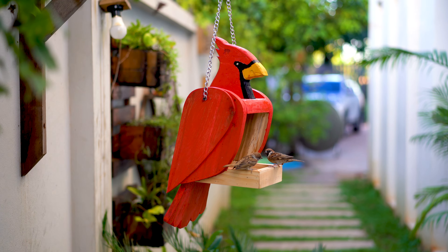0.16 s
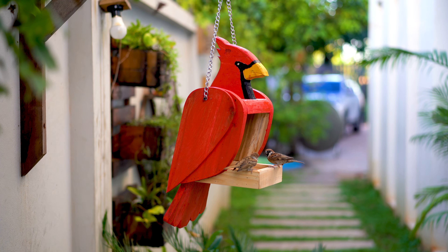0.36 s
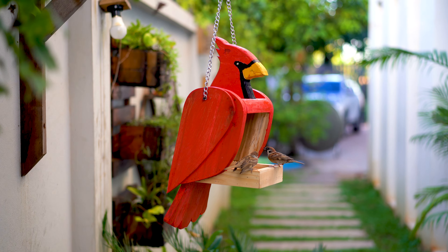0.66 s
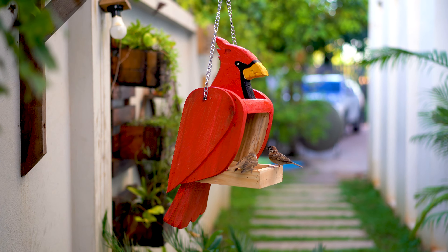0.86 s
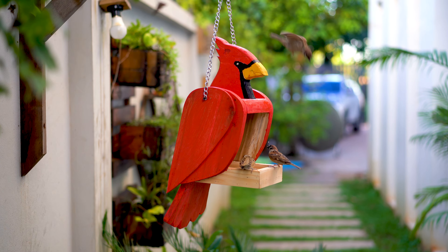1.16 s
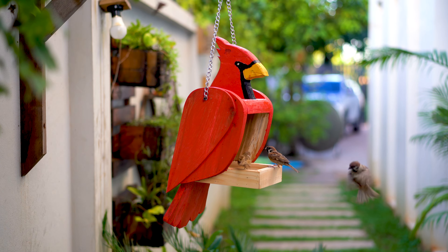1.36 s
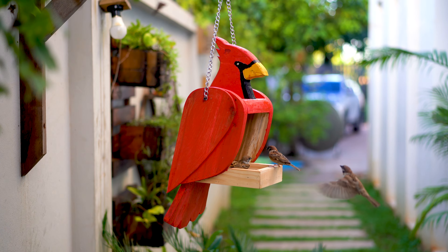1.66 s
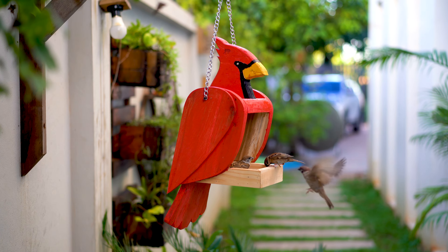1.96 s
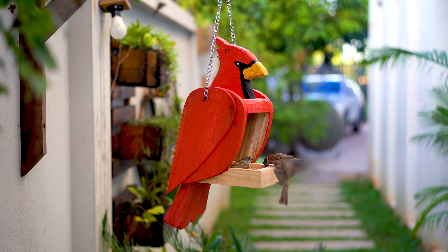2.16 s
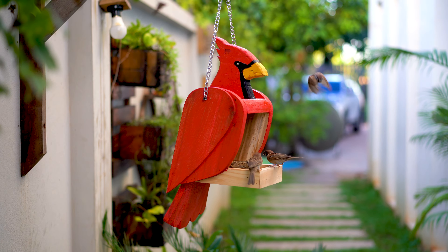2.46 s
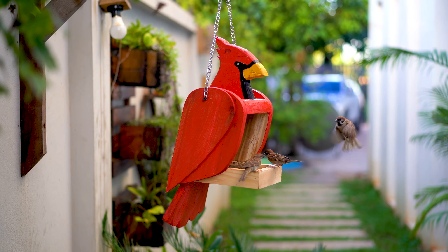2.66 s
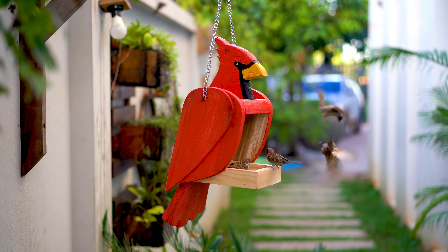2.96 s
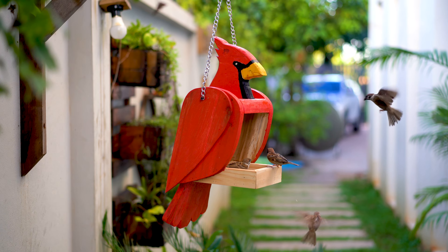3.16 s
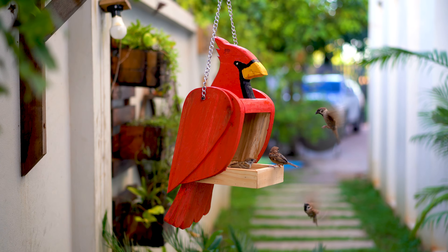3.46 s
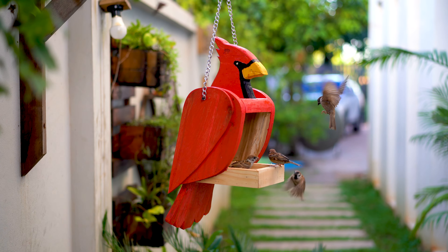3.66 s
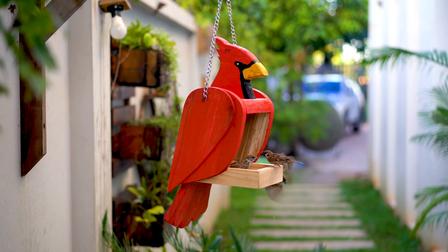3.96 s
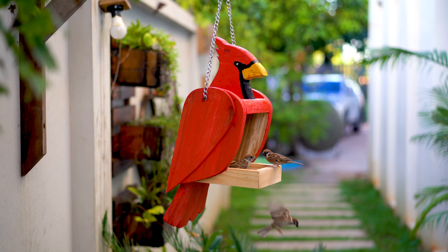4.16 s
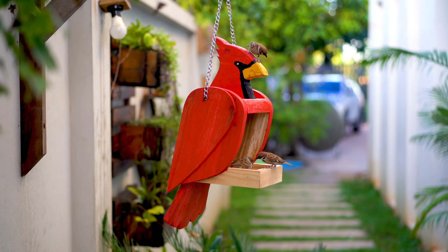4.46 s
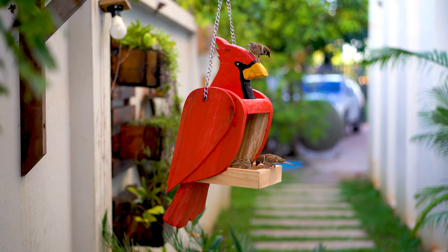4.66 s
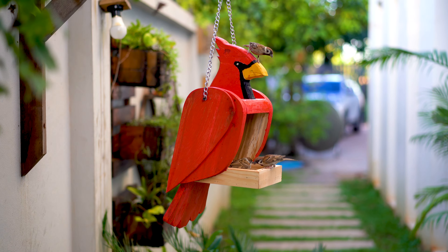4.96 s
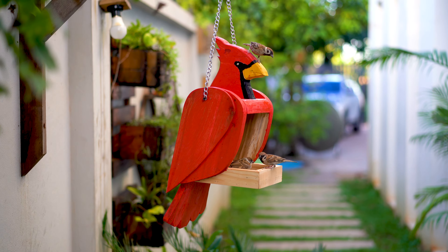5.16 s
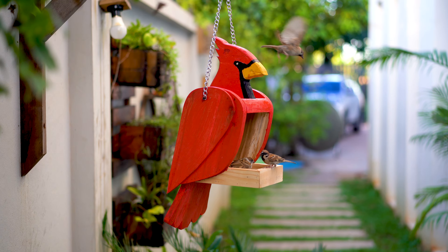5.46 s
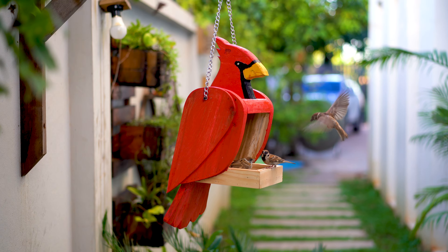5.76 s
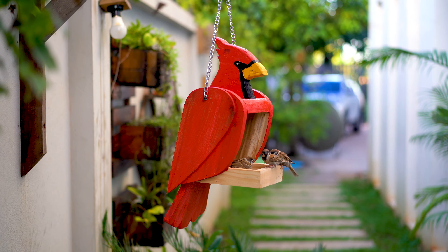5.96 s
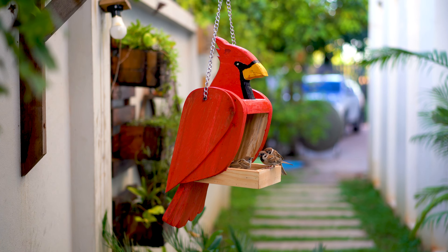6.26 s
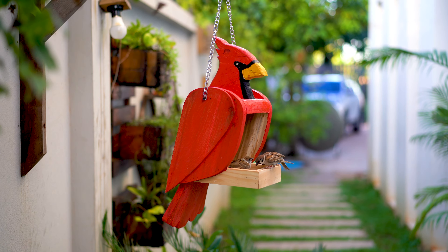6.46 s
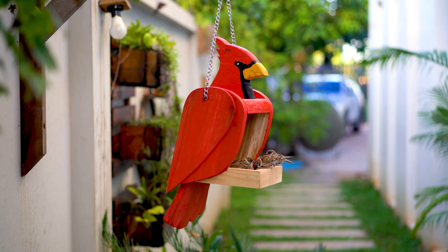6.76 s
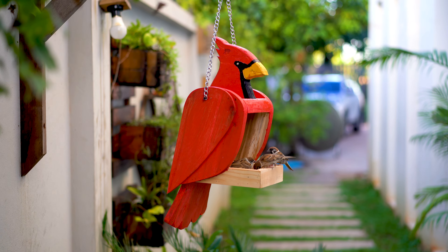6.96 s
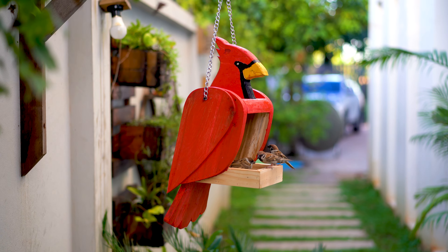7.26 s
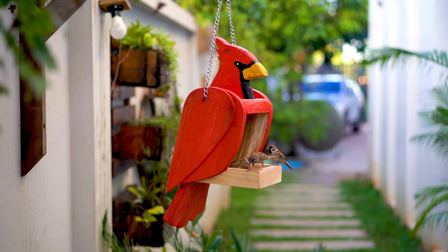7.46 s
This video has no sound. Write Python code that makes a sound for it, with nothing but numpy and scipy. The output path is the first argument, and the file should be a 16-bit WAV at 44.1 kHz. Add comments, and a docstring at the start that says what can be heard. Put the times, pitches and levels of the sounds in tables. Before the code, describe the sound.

A quiet walled garden with a soft leafy wash, very faint hum and high, steady insect shimmer, picked up in stereo near a feeder. A nearby sparrow gives sharp, hoarse-edged, falling chirps at about 0.1, 0.8, 1.9, 2.8 and 4.3 seconds, each under a tenth of a second, with short wall echoes. Faint sparrows answer between them. Thin insect buzzes come in bouts until 3.1; a pulsing cricket fades by 3.7 and a slightly lower one starts at 4.5. Light husk and feather rustling begins around 1.2, with a claw tick at 3.0 and a brief flutter with two ticks near 3.9. Distant roosters crow faintly from 1.2 to 3.4. A second sparrow chirps at 4.6, 5.4, 6.1 and 6.9. Five mellow, rising hoots sound from 4.5 to 6.0, then rough, echoing rooster crows from 6.15 to the end.

```python
"""Two sparrows chirp in turn at a feeder in a narrow walled garden: two whistled voices glide down in
each chirp, and sparse reflections from the walls smear it. Farther off a sparrow answers, a larger bird
hoots five times and roosters crow, their harmonics shaped by throat resonances. Shaped noise makes
the rustling wings, claw ticks and rush of air at the feeder, the shrill insects in the bushes
and the low outdoor wash; sines add faint hums."""
import sys
import numpy as np
from scipy import signal
from scipy.fft import rfft, irfft
from scipy.io import wavfile

SR = 44100
rng = np.random.default_rng(int(sys.argv[2]) if len(sys.argv) > 2 else 0)


def store_wav(level_fs):
    """Save 16-bit WAV to argv[1]."""
    pcm = np.round(np.clip(np.atleast_2d(level_fs), -1, 1) * 32767)
    wavfile.write(sys.argv[1], SR, pcm.T.astype(np.int16))


N = 335160
TIME = np.arange(N) / SR  # s
BINS = np.fft.rfftfreq(N, 1 / SR)  # Hz

# Sparrow chirps, one table a bird: start_s, level_db, pitch_hz, length_s
LEFT_CHIRPS = [(.059, -17.7, 4700, .080), (.820, -17.3, 4680, .079), (1.897, -17.6, 4630, .076),
               (2.814, -17.6, 4560, .074), (4.297, -16.4, 4560, .074)]
RIGHT_CHIRPS = [(4.601, -19.7, 4460, .067), (5.390, -18.5, 4470, .067), (6.126, -18.3, 4500, .067),
                (6.926, -18.2, 4530, .068)]
FAR_CHIRPS = [(.31, -46, 4250, .10), (.69, -52, 4800, .07), (1.16, -46, 4940, 0.13),
              (1.48, -44, 4520, 0.12), (2.07, -47.5, 4200, .11), (2.66, -44.5, 4260, .12),
              (3.21, -44, 4390, 0.09), (3.80, -47.5, 4230, .12), (6.36, -41, 4570, .11)]
# Air hissing through the beak with each chirp: frequency_hz, relative_density_db
BEAK_HISS = [(2000, -25), (4000, 11), (7500, 0), (9000, -3), (11500, -12), (13200, -3), (14500, -3),
             (16000, -21)]
# A chirp opens high and hoarse, breaks into a loud whistle, crests, and falls as it fades
BREAK_AT, CREST_AT, FADE_AT = .32, .47, .64  # shares of the chirp's length
OPENING_LIFT, FALL = .09, .41  # pitch above the crest in the opening, below it at the end (shares)
VOICE_SPREAD = .3  # how much higher the second voice starts (share of the pitch)
BREAK_STEP_DB, RELEASE_DB = 3, -20  # the opening is this much weaker; level change of the final fade
BREAK_PUFF_DB = 10.5  # extra hiss as the voice breaks

# Hoots: start_s, length_s, pitch_hz, level_db, scoop_s (time up to the pitch), swell_db (over the note)
HOOTS = [(4.494, 0.16, 1077, -38.5, 0.0049, -12), (4.742, .14, 1067, -31, 0.026, 9),
         (5.05, 0.17, 1069, -33, 0.021, 8), (5.386, .19, 1116, -26, .11, 4.5),
         (5.791, .16, 1109, -26, .09, -2)]
HOOT_SCOOP, HOOT_DROP_S, HOOT_SLACK_DB = .115, .046, -13  # full pitch sag (share), closing time, its level
# Crow syllables: start_s, length_s, pitch_hz, level_db, roughness (0-1), overtones_db
FAR_CROWS = [(1.97, 0.33, 720, -42.5, 0.26, 1), (2.23, 0.163, 848, -37.5, 0.53, 0),
             (2.40, 0.2, 835, -51, 0.56, 0), (2.69, 0.14, 635, -47, 0.3, -1),
             (2.86, 0.294, 743, -47.5, .27, -4), (3.22, .15, 720, -49, .35, -11)]
FAINT_CROWS = [(1.2, 0.385, 425, -54.5, 0.89, 0), (1.629, 0.194, 408.6, -44.5, 0.53, 5)]
NEAR_CROWS = [(6.15, 0.14, 907.6, -38, 0.47, 1), (6.23, .12, 1009, -34.5, 0.54, -2.5),
              (6.27, 0.178, 884.5, -38, 0.43, 4), (6.5, 0.166, 1048, -34.5, 0.083, 2),
              (6.63, .47, 1015, -38, 0.365, 7)]
# The near rooster's second voice in its long note, same columns
UNDERTONE = [(6.49, .68, 911.5, -46, 0.516, -1.3)]
LAST_CROWS = [(6.64, 0.62, 746, -45, 0.615, 0), (7.13, 0.22, 735, -37.5, 0.41, 1.9),
              (7.42, .22, 750, -46.5, 0.34, 0.067)]
CROW_ARCH, CROW_ATTACK_S, CROW_RELEASE_S = .035, .026, .057  # end pitch sag (share), rise and fall times
# Throat resonances: frequency_hz, gain_db
HOOT_THROAT = [(1100, 0), (2200, -26), (3300, -23), (4400, -40)]
FAR_THROAT = [(600, 0), (730, 0), (1400, -9), (1700, -8), (2200, -10), (2500, -17), (4200, -35)]
FAINT_THROAT = [(420, -28), (820, 1), (1230, 3), (1620, 9), (2050, -17), (2500, -28)]
NEAR_THROAT = [(900, -1), (1050, -2), (1800, -12), (1970, -9), (2080, 1), (2650, -7), (3100, -12),
               (4200, -24)]
LAST_THROAT = [(730, -33), (1450, -6), (2200, 5), (2900, 3), (3600, -44), (4400, -3)]

# Flights round the feeder: start_s, end_s, rustle_db (feathers), rush_db (low rush of air)
FLIGHTS = [(1.21, 1.71, -54, -57.5), (1.6, 2.706, -52.5, -75), (2.448, 3.85, -49, -56),
           (3.78, 4.517, -48.5, -56.5)]
FLIGHT_TAPER = .45  # share of a flight spent swelling and fading
# Wing strokes: centre_s, peak_level_db, length_s
WINGS = [(3.939, -43, 0.088), (3.978, -48, .04), (4.03, -40, 0.069)]
# Claw ticks: start_s, initial_level_db
TICKS = [(3, -21.5), (3.9279, -16), (3.9712, -21)]
PECKING_FROM_S, PECKING_DB = 1.14, -52.5  # steady rustle of husks
# Spectrum of husks and feathers: frequency_hz, relative_density_db
RUSTLE_COLOUR = [(100, -34), (400, -11.5), (1100, -2.5), (2500, -6.5), (6000, -7), (15000, -12)]

# Steady insect choruses: centre_hz, nominal_width_hz, level_db
CHORUS = [(5180, 480, -50), (6554, 305, -47), (10305, 590, -50)]
# Throbbing crickets, one falling silent and one starting: time_s, level_db
HIGH_CRICKET = [(0, -45.5), (1.4, -43), (1.5, -48.5), (3.5, -57), (3.7, -80)]
LOW_CRICKET = [(4.47, -82), (4.52, -44), (7.6, -45.5)]
CRICKET_PAN = -4  # left minus right, dB
# Katydid buzzes: start_s, end_s
BUZZES = [(0, .29), (.494, 1), (1.193, 1.68), (2.057, 2.45), (2.74, 3.14)]
BUZZ_DB = -47.8

# Spectrum of the outdoor wash: frequency_hz, relative_density_db
WASH = [(25, -36), (50, -12), (90, -10.5), (160, -10.5), (300, -4), (400, -6), (520, 5.5), (800, -3.5),
        (1500, -5), (2400, -7), (3300, 2), (4400, 3.5), (7600, -8.5), (10500, -0.5), (12000, -23),
        (16000, -16)]
# Left-right likeness of all diffuse noise: frequency_hz, likeness (0-1)
SAME = [(130, 1), (290, 0.95), (640, 0.66), (1400, 0.16), (3000, 0)]
WASH_DB, RUMBLE_DB = -46.5, -65  # leaves and street; the street's rumble
# Spectrum of the low rumble and the rush of air: frequency_hz, relative_density_db
RUMBLE_COLOUR = [(40, -43), (110, 7.5), (200, 1.5), (330, 5.5), (900, 4), (2500, -50)]
# Hums before their common swell: frequency_hz, level_db
HUMS = [(100, -71), (684, -62)]
# Common swell of the hums: time_s, gain_db
HUM_SWELL = [(0, -14), (1.6, -9), (2.6, -1), (7.6, 0)]


def sparrow(chirps, swell_db, dip, second_ratio, second_db, hoarse_db, jitter, rasp, hiss_db, third_db):
    """Two-voice syrinx: both sides whistle a falling glide; the opening is hoarse, its voices far apart."""
    out, air = np.zeros(N), np.zeros(N)
    for start, db, pitch, length in chirps:
        u = np.arange(0, 1, 1 / (length * SR))  # share of the chirp elapsed
        opening = 1 / (1 + (u / BREAK_AT) ** 20)
        to_full = np.maximum(1 - u / CREST_AT, 0)
        to_crest = np.clip((CREST_AT - u) / (CREST_AT - BREAK_AT), 0, 1)
        falling = np.maximum(u - CREST_AT, 0) / (1 - CREST_AT)
        fading = np.maximum(u - FADE_AT, 0) / (1 - FADE_AT)

        rise = OPENING_LIFT * opening - dip * (1 - opening) * np.sqrt(to_crest)
        hz = pitch * (1 + rise - FALL * falling ** 1.2)
        effort_db = -swell_db * to_full - BREAK_STEP_DB * opening + RELEASE_DB * fading ** 1.5

        first_shake = 1 + jitter * (1 + 1.475 * opening) * wander(len(u), 676)
        first = phase_of(hz * first_shake)
        second_hz = hz * (second_ratio + VOICE_SPREAD * to_full)
        second = phase_of(second_hz * (1 + 2 * jitter * wander(len(u), 534)))
        voice = np.sin(first) + amp(second_db + hoarse_db * opening) * np.sin(second)
        voice += amp(third_db) * np.sin(3 * first)  # third harmonic
        rough_voice = voice * (1 + rasp * wander(len(u), 570))

        edges = amp(db) * signal.windows.tukey(len(u), .05)
        puff = np.exp(-((u - BREAK_AT) / 0.17) ** 2)
        add(out, start, edges * unit(amp(effort_db) * rough_voice))
        add(air, start, edges * amp(hiss_db + .5 * effort_db + BREAK_PUFF_DB * puff))
    return out + air * noise(amp(read(BEAK_HISS, BINS)))[0]


def sparrows():
    """Direct-to-reverberant ratio: near birds with early wall echoes, a far one with stronger echoes."""
    near = dict(jitter=.025, rasp=.18, hiss_db=-13.5)
    left = sparrow(LEFT_CHIRPS, swell_db=20, dip=0.119, second_ratio=1.21, second_db=-9.5,
                   hoarse_db=6.5, third_db=-28, **near)
    right = sparrow(RIGHT_CHIRPS, swell_db=18.5, dip=0.0466, second_ratio=1.25, second_db=-10.5,
                    hoarse_db=2.5, third_db=-35, **near)
    far = sparrow(FAR_CHIRPS, swell_db=3, dip=0, second_ratio=1.0, second_db=-14,
                  hoarse_db=-1, jitter=0.0404, rasp=.18, hiss_db=-26, third_db=-45)
    out = garden(left, lag=-7, pan_db=1.5, wall_db=0, wall_t60=.19, far_db=-11.0, far_t60=0.61)
    out += garden(right, lag=7, pan_db=-1.5, wall_db=0, wall_t60=.19, far_db=-3, far_t60=0.47)
    return out + garden(far, lag=0, pan_db=0, wall_db=6, wall_t60=.25, far_db=3, far_t60=.6)


def caller(note, rows, throat, jitter, waver):
    """Source and filter: harmonics of a wavering pitch pass the throat; roughness shakes the pitch faster."""
    out = np.zeros(N)
    for row in rows:
        start, hz, gain, rough, overtones_db = note(*row)
        hz = hz * (1 + waver * wander(len(hz), 35.2) + jitter * rough * wander(len(hz), 226))
        phase = phase_of(hz)
        voice = np.zeros(len(hz))
        for k in range(1, 7):
            harmonic_db = read(throat, k * hz) + overtones_db * (k > 1)
            voice += amp(harmonic_db) * np.sin(k * phase)
        add(out, start, gain * unit(voice))
    return out


def hoot(start, length, pitch, db, scoop_s, swell_db):
    """Coupled pitch and level: a clear note scoops up, holds and drops, weak wherever the pitch sags."""
    t = np.arange(0, length, 1 / SR)
    opening_sag = np.maximum(1 - t / scoop_s, 0) ** 1.32
    closing_sag = np.maximum(1 - (length - t) / HOOT_DROP_S, 0) ** 2
    sag = opening_sag + closing_sag
    level_db = db + swell_db * (t / length - .5) + HOOT_SLACK_DB * sag
    gain = amp(level_db) * signal.windows.tukey(len(t), .08)
    return start, pitch * (1 - HOOT_SCOOP * sag), gain, 1, 0


def crow(start, length, pitch, db, rough, overtones_db):
    """Pitch contour and envelope of a syllable: a shallow arch under attack, hold and release."""
    t = np.arange(0, length, 1 / SR)
    attack = np.minimum(t / CROW_ATTACK_S, 1)
    release = np.minimum((length - t) / CROW_RELEASE_S, 1)
    hz = pitch * (1 - CROW_ARCH * (2 * t / length - 1) ** 2)
    return start, hz, amp(db) * attack * release, rough, overtones_db


def neighbours():
    """Reverberation between houses: the hooting bird and the roosters ring on in long tails."""
    hoots = caller(hoot, HOOTS, HOOT_THROAT, jitter=0.011, waver=0.0106)
    far = caller(crow, FAR_CROWS, FAR_THROAT, jitter=0.072, waver=0.0096)
    far += caller(crow, FAINT_CROWS, FAINT_THROAT, jitter=0.095, waver=0.0134)
    near = caller(crow, NEAR_CROWS + UNDERTONE, NEAR_THROAT, jitter=0.0725, waver=0.0078)
    near += caller(crow, LAST_CROWS, LAST_THROAT, jitter=0.0744, waver=0.0124)
    out = garden(hoots, lag=5, pan_db=-2.5, wall_db=-11, wall_t60=.4, far_db=-8, far_t60=.9)
    out += garden(far, lag=0, pan_db=0.5, wall_db=1.5, wall_t60=0.28, far_db=1.5, far_t60=0.85)
    return out + garden(near, lag=2, pan_db=-2, wall_db=1.5, wall_t60=0.32, far_db=2.5, far_t60=1.0)


def feeder():
    """Friction and impact noise: grainy husks and feathers, a low rush of air, dry ticks of claws."""
    rustle = amp(PECKING_DB) * np.clip((TIME - PECKING_FROM_S) / 0.11, 0, 1)
    rush, ticks = np.zeros(N), np.zeros(N)
    for start, end, rustle_db, rush_db in FLIGHTS:
        flight = bout(start, end, FLIGHT_TAPER)
        rustle += amp(rustle_db) * flight
        rush += amp(rush_db) * flight
    for centre, db, length in WINGS:
        add(rustle, centre - length / 2, amp(db) * np.hanning(int(length * SR)))
    t = TIME[:400]
    for start, db in TICKS:
        add(ticks, start, amp(db) * rng.standard_normal(len(t)) * np.exp(-t / 0.00047))
    grain = unit(amp(2.0 * wander(N, 240) + 2.2 * wander(N, 25)))
    feathers = rustle * grain * noise(amp(read(RUSTLE_COLOUR, BINS)))
    return feathers + rush * noise(amp(read(RUMBLE_COLOUR, BINS))) + ticks


def shrill(hz, width):
    """Resonance driven by noise: many wing strokes ring one peak, heard from afar."""
    return noise(1 / (1 + ((BINS - hz) / (1.04 * width)) ** 2) ** 1.37)


def cricket(curve, hz, second_hz, second_db, width, throb_rate, peak_s, stroke_rate, stroke_depth, pan_db):
    """Amplitude modulation: quick wing strokes in throbs that rock between two neighbouring rings."""
    throb_phase = 2 * np.pi * throb_rate * (TIME - peak_s) + 0.31 * wander(N, 7)
    first = .5 + .5 * np.cos(throb_phase)  # share of the first ring
    ring = first * shrill(hz, width)
    ring += amp(second_db) * (1 - first) * shrill(second_hz, 1.75 * width)
    strokes = 1 + stroke_depth * np.cos(2 * np.pi * stroke_rate * TIME + wander(N, 7.1))
    return level(curve) * unit(ring * strokes) * pan_gains(pan_db)


def insects():
    """Superposed stridulation: steady choruses, two crickets and a katydid that buzzes in bouts."""
    chorus = sum(amp(db) * shrill(hz, width) for hz, width, db in CHORUS)
    out = chorus * amp(.5 * wander(N, 8.0))
    out += cricket(HIGH_CRICKET, hz=9020, second_hz=8980, second_db=-6.5, width=330, throb_rate=7.6,
                   peak_s=0.202, stroke_rate=180, stroke_depth=0.12, pan_db=CRICKET_PAN)
    out += cricket(LOW_CRICKET, hz=8405, second_hz=8670, second_db=-3, width=430, throb_rate=8.1,
                   peak_s=4.585, stroke_rate=121, stroke_depth=0.2, pan_db=CRICKET_PAN)
    buzzing = sum(bout(start, end, taper=0.38) for start, end in BUZZES)
    return out + amp(BUZZ_DB) * buzzing * shrill(hz=11200, width=460)


def outdoors():
    """Diffuse field: a noise wash of leaves and street, a low rumble, and faint sine hums."""
    wash = amp(WASH_DB + 0.096 * wander(N, 12.9)) * noise(amp(read(WASH, BINS)))
    rumble = amp(RUMBLE_DB) * noise(amp(read(RUMBLE_COLOUR, BINS)))
    hum = np.zeros(N)
    for hz, db in HUMS:
        gain = np.sqrt(2) * amp(db + 0.65 * wander(N, 9.2))  # root two turns rms to peak
        hum += gain * np.sin(2 * np.pi * hz * TIME + 0.32 * wander(N, 14))
    return wash + rumble + level(HUM_SWELL) * hum


def garden(x, lag, pan_db, wall_db, wall_t60, far_db, far_t60):
    """Impulse response: direct sound (left late by lag samples), wall echoes, long tail from the houses."""
    paths = amp(wall_db) * tail(wall_t60, per_s=1600) + amp(far_db) * tail(far_t60, per_s=2200)
    paths[0, max(round(lag), 0)] += 1
    paths[1, max(round(-lag), 0)] += 1
    paths /= np.sqrt((paths ** 2).sum(1, keepdims=True))
    return signal.fftconvolve(x[None], paths, axes=1)[:, :N] * pan_gains(pan_db)


def tail(t60, per_s):
    """Exponential decay: sparse reflections of random sign die 60 dB in t60 s, energy 1 a channel."""
    t = TIME[:SR]
    signs = rng.choice([-1., 1.], (2, SR))
    arrivals = rng.random((2, SR)) < per_s / SR
    taps = signs * arrivals * amp(-60 * t / t60) * (t > .002)
    return taps / np.sqrt((taps ** 2).sum(1, keepdims=True) + 1e-12)


def noise(gain):
    """Interchannel coherence: two channels of coloured noise of joint rms 1, alike in the bass."""
    a, b = rfft(rng.standard_normal((2, N)))
    same = np.clip(read(SAME, BINS), -1, 1)
    right = same * a + np.sqrt(1 - same ** 2) * b
    return unit(irfft(np.array([a, right]) * gain, N))


def wander(n, rate):
    """Low-passed chance: smooth noise, scaled to rms 1 over at least 1 s, with changes up to about rate Hz."""
    size = max(n, SR)
    fade = np.exp(-(np.fft.rfftfreq(size, 1 / SR) / rate) ** 2)
    return unit(irfft(rfft(rng.standard_normal(size)) * fade, size))[:n]


def phase_of(hz):
    """Phase in radians is the running sum of instantaneous frequency."""
    return 2 * np.pi * np.cumsum(hz) / SR


def bout(start, end, taper):
    """Envelope: a gain that swells, holds at 1 and fades between two times."""
    out = np.zeros(N)
    add(out, start, signal.windows.tukey(int((end - start) * SR), taper))
    return out


def pan_gains(pan_db):
    """Interaural level difference: left minus right in dB, split evenly between the channels."""
    return amp([[pan_db / 2], [-pan_db / 2]])


def amp(db):
    """Logarithmic level: decibels to amplitude gain."""
    return 10 ** (np.asarray(db) / 20)


def unit(x):
    """Effective value: scales to rms 1."""
    return x / np.sqrt(np.mean(x ** 2) + 1e-20)


def read(points, hz):
    """Spectral envelope: points joined by straight lines over log frequency."""
    f, value = np.transpose(points)
    return np.interp(np.log(hz + 1), np.log(f + 1), value)


def level(rows):
    """Level contour: a dB curve as a gain for every sample."""
    return amp(np.interp(TIME, *np.transpose(rows)))


def add(mix, s, sound):
    """Superposition: mixes a sound in at time s."""
    part = mix[max(round(s * SR), 0):][:len(sound)]
    part += sound[:len(part)]


def scene():
    """Superposition of birds near and far, the feeder, insects and the outdoor wash."""
    return sparrows() + neighbours() + feeder() + insects() + outdoors()


def record(dry):
    """Band limiting: the microphone's low cut at 42 Hz, then a steep upper limit at 15.8 kHz."""
    low_cut = signal.butter(2, 42, "highpass", fs=SR, output="sos")
    thinned = signal.sosfilt(low_cut, dry)
    upper_limit = signal.firwin(511, 15800, window=("kaiser", 9), fs=SR)
    return signal.oaconvolve(thinned, upper_limit[None], "same")


dry = scene()
out = record(dry)
store_wav(out)
```